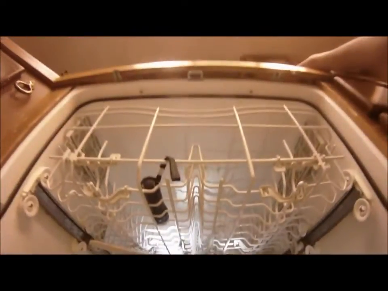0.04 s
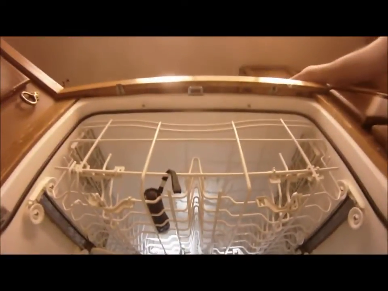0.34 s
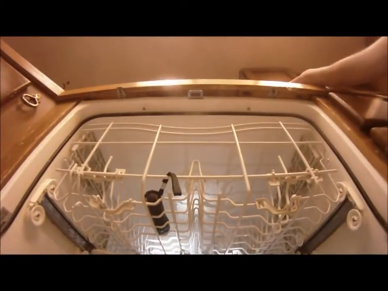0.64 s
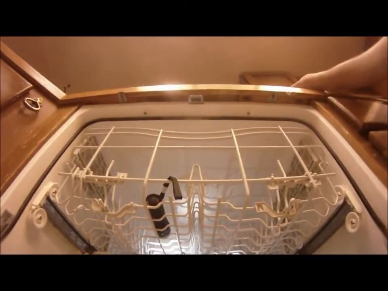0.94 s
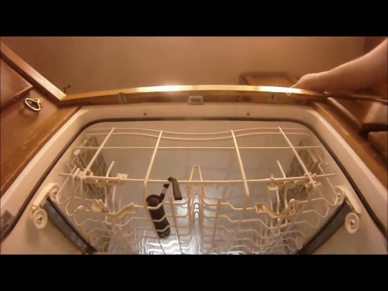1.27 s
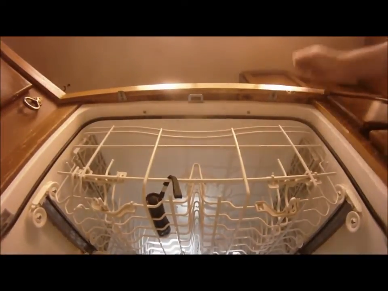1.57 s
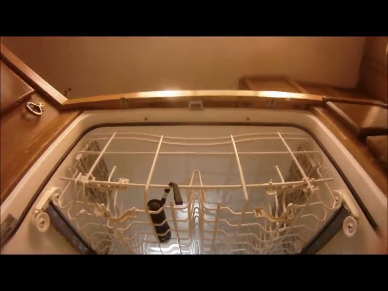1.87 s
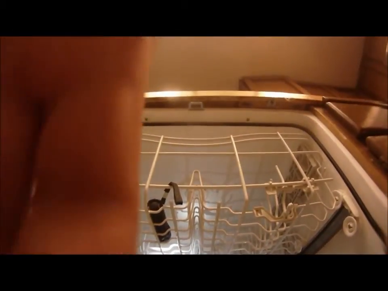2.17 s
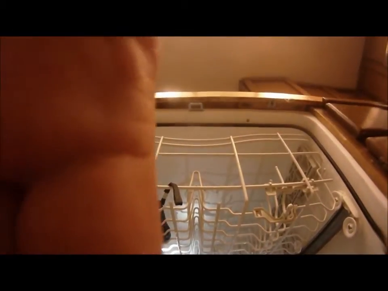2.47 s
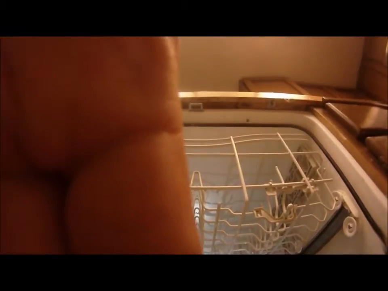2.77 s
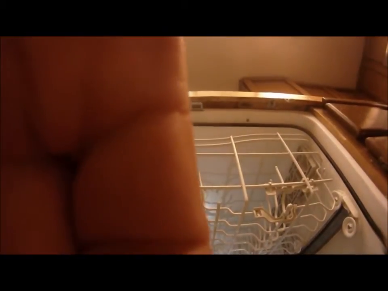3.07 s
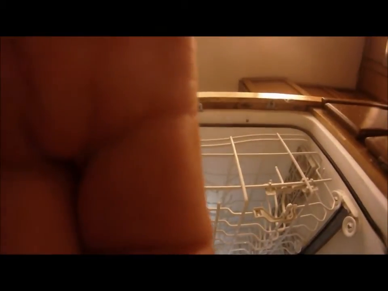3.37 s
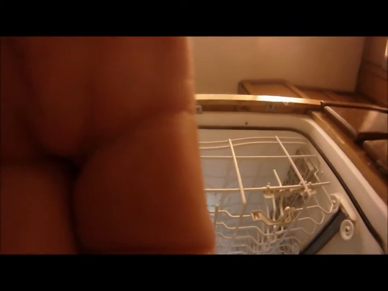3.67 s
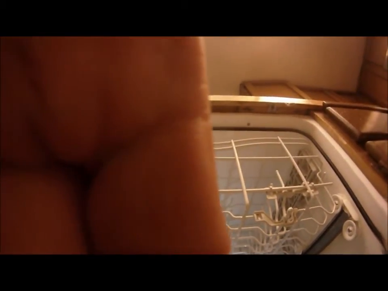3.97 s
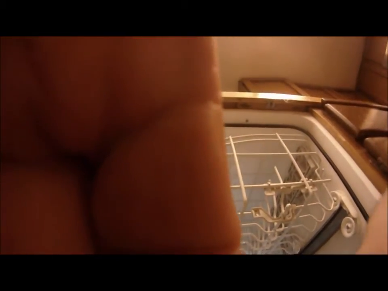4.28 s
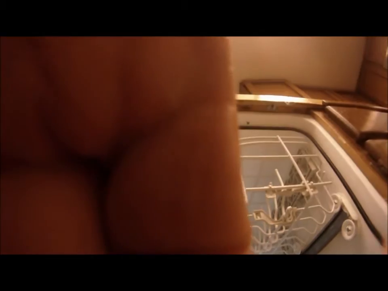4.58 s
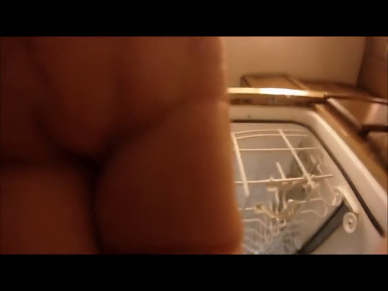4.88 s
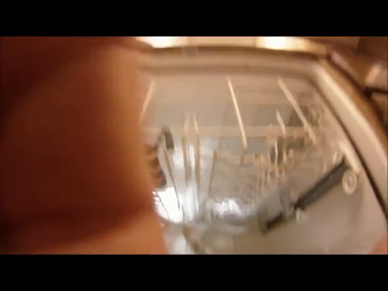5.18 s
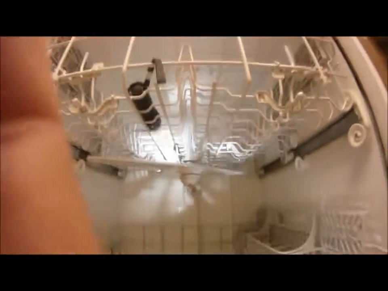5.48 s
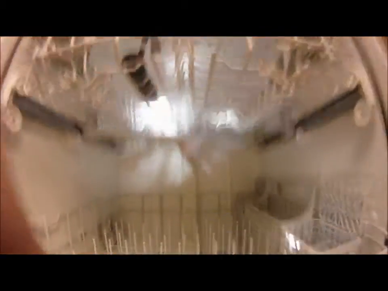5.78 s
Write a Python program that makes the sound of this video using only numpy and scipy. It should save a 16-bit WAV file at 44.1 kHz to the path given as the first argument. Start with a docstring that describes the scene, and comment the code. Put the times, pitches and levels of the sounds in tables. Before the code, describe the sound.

A dishwasher rack is pushed home, its wires chattering and the tub rumbling softly, until it clinks against its stop. After a few faint taps, very close handling noise takes over: a hand rubs and drags across the camera, with short skin squeaks, sharp clicks of the case and dull, heavy finger thumps beside the microphone. A faint kitchen hush lies underneath, and the sound has a slightly gritty top.

```python
"""A low rumble and a rattle of wires: the rack of an open dishwasher rolls home, clinks, bumps its stop.
Then a hand takes hold of the camera: skin scrapes and squeaks over the case, the case clicks,
and fingers pressing beside the microphone port (its small opening) make deep thumps.
The camera samples coarsely, which mirrors everything into a thin, gritty treble."""
import sys
import numpy as np
from scipy import signal
from scipy.fft import rfft, irfft, next_fast_len
from scipy.io import wavfile
from scipy.ndimage import map_coordinates

SR = 44100
rng = np.random.default_rng(int(sys.argv[2]) if len(sys.argv) > 2 else 0)


def master(y):
    """Save y as 16-bit WAV."""
    cut = np.clip(np.atleast_2d(y).T, -1, 1)
    pcm = np.round(cut * 32767)  # scale
    wavfile.write(sys.argv[1], SR, pcm.astype(np.int16))


N = 257103


def amp(db):
    """Turn decibels (dB) into a gain to multiply by."""
    return 10 ** (np.asarray(db) / 20)


def unit(x):
    """Scale x to an average (rms) level of 1."""
    return x / np.sqrt(np.mean(x ** 2) + 1e-20)


def peak_one(x):
    """Scale x to a peak of 1."""
    return x / (np.abs(x).max() + 1e-20)


def add(track, start, x):
    """Mix x into the track, start seconds in."""
    i = max(round(start * SR), 0)
    track[i:i + len(x)] += x[:max(N - i, 0)]


def wobble(rate):
    """A smooth curve through this many random values a second."""
    values = rng.standard_normal(int(N * rate / SR) + 4)
    return map_coordinates(values, [np.arange(N) * rate / SR])


def slips(rate, spread_db):
    """Tiny jerks at random moments and of random size, about rate a second."""
    jerks = (rng.random(N) < rate / SR) * rng.choice([-1, 1], N)
    return unit(jerks * amp(spread_db * rng.standard_normal(N).clip(-2, 2)))


def burst(t, fade):
    """Noise that drops 60 dB in fade seconds."""
    return rng.standard_normal(len(t)) * amp(-60 * t / fade)


def ring(modes, t, attack):
    """A struck object's fading tones (modes), at new strengths for each blow."""
    tones = sum(amp(db + rng.normal(0, 4.7) - 60 * t / fade) * np.sin(2 * np.pi * hz * t)
                for hz, db, fade in modes)
    return peak_one(tones * (1 - np.exp(-t / attack)))


def bell(hz, centre, width):
    """Gain of one resonance: 1 at its centre, less to either side."""
    return 1 / np.sqrt(1 + (2 * (hz - centre) / width) ** 2)


def tone_gain(tone, hz):
    """Gain at hz, read off a curve through (Hz, dB) points."""
    points_hz, points_db = np.transpose(tone)
    return amp(np.interp(np.log(hz + 1), np.log(points_hz + 1), points_db))


def filtered(x, response):
    """Filter x by the gain that response gives for each frequency."""
    size = 2 * next_fast_len(len(x) // 2 + 4096)
    gain = np.maximum(response(np.fft.rfftfreq(size, 1 / SR)), 1e-6)
    cepstrum = irfft(np.log(gain))
    # folding this in half makes the filter ring after a sound, never before it
    cepstrum[1:size // 2] *= 2
    cepstrum[size // 2 + 1:] = 0
    return irfft(rfft(x, size) * np.exp(rfft(cepstrum)), size)[:len(x)]


def coloured(x, tone):
    """Shape x with a tone curve, at an average level of 1."""
    return unit(filtered(x, lambda hz: tone_gain(tone, hz)))


# Resonances of the camera case. Each row: pitch in Hz, width in Hz, strength in dB.
CASE_RESONANCES = [(703, 100, -4.5), (1148, 187, 3.5), (1866, 243, 6), (2436, 300, 0.5), (3060, 126, 3),
                   (3610, 390, 6.5), (4610, 150, 3.5), (5200, 370, -3)]
def through_case(x, tone, ringing=1):
    """Shape x with a tone curve and the case's resonances; a loose hold lets them ring more."""
    def response(hz):
        boost = sum(amp(db) * ringing * bell(hz, pitch, width / ringing) ** 2
                    for pitch, width, db in CASE_RESONANCES)
        return tone_gain(tone, hz) * (1 + boost)
    return unit(filtered(x, response))


# The room's tone. Each row: frequency in Hz, relative level in dB.
KITCHEN_TONE = [(12, -0.5), (20, 3), (63, -8), (262, -22), (825, -30), (2260, -30.5), (4940, -37.5),
                (7500, -45)]
def kitchen():
    """The steady, low hush of a quiet room."""
    return amp(-50.5) * coloured(rng.standard_normal(N), KITCHEN_TONE)


def jingle(rate, spread_db, fade):
    """Many loose wires, each pinging briefly at its own pitch."""
    out, t = np.zeros(N), np.arange(SR // 25) / SR
    for when, pitch, size in rng.random((int(rate * N / SR), 3)):
        hz = 900 * (5500 / 900) ** pitch
        add(out, when * N / SR, amp(spread_db * size - 60 * t / fade) * np.sin(2 * np.pi * hz * t))
    return unit(out)


def push(start, length, db, fade_db_per_s):
    """Gain of one push: the rack gets up to speed, rolls and comes to rest."""
    t = np.arange(N) / SR - start
    onset = np.sqrt(np.clip(t / 0.0025, 0, 1))
    return onset * amp(db - fade_db_per_s * np.maximum(t - length, 0))


# Tones of the tub and of the wires. Each row: frequency in Hz, relative level in dB.
TUB_TONE = [(12, -32), (20, -20), (43, -8), (64, 6.5), (118, -20.5), (182, -13), (248, -38), (330, -46),
            (600, -82)]
WIRE_TONE = [(300, -2), (600, -17), (950, -16), (1250, -11.5), (1750, -17), (2150, -3.5), (2550, -9.5),
             (3300, -7), (4200, -14.5), (5300, -6.5), (7500, -38)]
# A push, then a small shift. Each row: start and length in seconds, rumble and rattle levels in dB.
RACK_PUSHES = [(0.0, 0.53, -35, -53.5), (1.3, 0.68, -58, -72)]
def rolling_rack():
    """The wheels shake the tub and set the wires chattering."""
    roll = sum(push(start, length, db, fade_db_per_s=88) for start, length, db, _ in RACK_PUSHES)
    rattle = sum(push(start, length, db, fade_db_per_s=178) for start, length, _, db in RACK_PUSHES)
    rumble = coloured(rng.standard_normal(N), TUB_TONE)
    loose_wires = jingle(rate=1200, spread_db=20, fade=0.016) + slips(rate=9000, spread_db=3)
    chatter = through_case(loose_wires * amp(3 * wobble(60.2)), WIRE_TONE)
    return roll * rumble + rattle * chatter


# The tub's panels. Each row: pitch in Hz, relative level in dB, seconds to fade by 60 dB.
TUB_MODES = [(45.8, 11, 0.59), (63, 19.5, 0.22), (98.6, 7, 0.32), (162.2, 7.5, 0.11), (202, -7, 0.23)]
# Jolts of the tub. Each row: start in seconds, relative level in dB, favoured pitch in Hz.
TUB_BUMPS = [(0.096, -15.5, 63), (0.239, -24, 185), (0.312, -23.5, 147), (0.424, -24, 201),
             (0.466, -20, 64), (0.531, -20, 143), (0.688, -31, 160), (0.911, -21, 69.6), (0.97, -23, 51.6),
             (1.487, -28, 65)]
def tub_bumps():
    """The rack nudges the tub; each jolt mostly rings the panel tones near its own pitch."""
    out, t = np.zeros(N), np.arange(SR // 3) / SR
    for start, db, pitch in TUB_BUMPS:
        modes = [(hz, level - 9 * abs(np.log2(hz / pitch)), fade) for hz, level, fade in TUB_MODES]
        add(out, start, amp(db - 7.5) * ring(modes, t, attack=0.006))
    return out


# Ticks as the rack settles. Each row: start in seconds, peak level in dB, pitch in Hz.
WIRE_TICKS = [(0.81, -47, 4770), (0.966, -47.5, 3400), (1.287, -49, 3560), (1.699, -52, 1150),
              (1.823, -44, 2860), (1.883, -45.5, 2220)]
def wire_ticks():
    """Single light touches of wire on wire, too weak to rebound."""
    out, t = np.zeros(N), np.arange(SR // 16) / SR
    for start, db, pitch in WIRE_TICKS:
        tick = filtered(burst(t, fade=0.02), lambda hz: bell(hz, pitch, 1700) ** 2)
        add(out, start, amp(db) * peak_one(tick))
    return out


# The rack's ring. Each row: pitch in Hz, relative level in dB, seconds to fade by 60 dB.
WIRE_MODES = [(1083, -16.5, 0.056), (2158, -4, 0.094), (2580, -3, 0.046), (3260, -4, 0.068),
              (3680, -12, 0.05)]
# Wire hitting wire. Each row: start in seconds, relative level in dB, pitch in Hz.
WIRE_TAPS = [(0.012, -42, 1305), (0.078, -43, 2130), (0.092, -37.5, 3280), (0.119, -34.5, 3330),
             (0.144, -29.5, 3210), (0.193, -34, 2205), (0.254, -34.5, 2340), (0.271, -39, 1310),
             (0.415, -34.5, 2290), (0.508, -40, 2200), (0.608, -40, 2840), (1.316, -46, 2100),
             (1.375, -42, 2600), (1.426, -43, 3050), (1.492, -39.5, 990), (1.8, -40.5, 3120),
             (1.917, -41, 1840)]
def wire_taps():
    """A struck wire rings and rebounds twice; the rest of the rack rings more weakly."""
    out, t = np.zeros(N), np.arange(SR // 8) / SR
    rebound_s, rebound_loss_db = 0.0044, 2
    for start, db, pitch in WIRE_TAPS:
        struck = (pitch, 9, 0.031)
        # no two wires are quite alike
        others = [(hz * (1 + 0.05 * rng.normal()), level, fade) for hz, level, fade in WIRE_MODES]
        for hit in range(3):
            tick = peak_one(through_case(burst(t, fade=0.015), WIRE_TONE))
            delay = hit * rebound_s * rng.uniform(0.78, 1.4)
            tap = ring([struck] + others, t, attack=0.00013) + amp(-4) * tick
            add(out, start + delay, amp(db - 4 - hit * rebound_loss_db) * tap)
    return out


# The rail's ring. Each row: pitch in Hz, relative level in dB, seconds to fade by 60 dB.
RAIL_MODES = [(2060, -25.5, 0.0072), (3280, -18.5, 0.0052), (4800, -6, 0.0077)]
# Knocks on the rail. Each row: start in seconds, relative level in dB.
RAIL_CLINKS = [(0.293, -35), (0.438, -39.5), (0.499, -38), (0.502, -34), (0.847, -18), (1.531, -44.5)]
def rail_clinks():
    """A wheel knocks on its rail: a short, bright ring with a faint scrape."""
    out, t = np.zeros(N), np.arange(SR // 8) / SR
    for start, db in RAIL_CLINKS:
        scrape = 0.043 * burst(t, fade=0.059)
        add(out, start, amp(db - 2) * peak_one(ring(RAIL_MODES, t, attack=0.0017) + scrape))
    return out


def rub(start, rise, fall, db, edge_db, curve):
    """Gain of one rub: skin lands edge_db under its peak, speeds up, slows down and lifts off."""
    landing_s, lift_s = 0.16 * rise, 0.006
    out, t = np.zeros(N), np.arange(int((rise + fall + 10 * lift_s) * SR)) / SR
    from_peak = np.where(t < rise, (rise - t) / rise, (t - rise) / fall)
    touching = np.minimum(t / landing_s, 1) * np.exp(-np.maximum(t - rise - fall, 0) / lift_s)
    add(out, start, amp(db - edge_db * from_peak ** curve) * touching)
    return out


def pressure(events, rise, fall):
    """Gain that builds up to each (seconds, dB) event and relaxes after it."""
    out, t = np.zeros(N), np.arange(-10 * rise, 10 * fall, 1 / SR)
    for when, db in events:
        add(out, when + t[0], amp(db) * np.exp(-np.maximum(-t / rise, t / fall)))
    return out


def singing(glide, width_hz):
    """A narrow band of noise whose pitch glides through (seconds, Hz) points."""
    hz, times, spectrum = signal.stft(rng.standard_normal(N), SR, nperseg=256)
    centre = np.interp(times, *np.transpose(glide))
    _, band = signal.istft(spectrum * bell(hz[:, None], centre, width_hz) ** 3, SR, nperseg=256)
    return unit(band[:N])


def catching_skin(rate):
    """Skin catches and lets go unevenly, so its tiny slips flicker in level."""
    return slips(rate, spread_db=3) * amp(2.5 * wobble(260))


# Creaks of the grip. Each row: start in seconds, peak level in dB, pitch in Hz.
GRIP_CREAKS = [(3.697, -32.5, 344), (3.706, -43.5, 1200), (3.746, -35, 825), (3.782, -36, 1080),
               (4.013, -34, 792)]
def grip_creaks():
    """The tightening grip lets go in small dull pops."""
    out, t = np.zeros(N), np.arange(SR // 25) / SR
    for start, db, pitch in GRIP_CREAKS:
        add(out, start, amp(db) * ring([(pitch, 0, 0.009)], t, attack=0.00015))
    return out


# The rasp's tone. Each row: frequency in Hz, relative level in dB.
GRAZE_TONE = [(400, -33), (1000, -3.5), (2500, -2), (4600, -1), (5400, 0.5), (7500, -21)]
# A fingertip brushes the port. Each row: start, rise and fall in seconds, level in dB.
PORT_GRAZES = [(2.17, 0.067, 0.15, -45), (2.35, 0.054, 0.031, -37), (2.47, 0.025, 0.066, -48.5),
               (2.62, 0.0067, 0.048, -48.5), (3.697, 0.0064, 0.014, -52), (4.361, .009, 0.04, -54),
               (4.676, 0.1, 0.258, -32), (5.08, 0.016, 0.014, -33.5), (5.11, 0.18, 0.24, -47.5)]
def port_grazes():
    """Skin ridges crossing the microphone port give a bright, gritty rasp."""
    touch = sum(rub(*row, edge_db=16, curve=2.25) for row in PORT_GRAZES)
    return touch * through_case(catching_skin(rate=2000), GRAZE_TONE)


# The open hand's tone. Each row: frequency in Hz, relative level in dB.
OPEN_HAND_TONE = [(100, -53), (300, -17), (450, -17), (650, -2), (870, -3), (1300, -4.5), (1850, 2),
                  (2150, -2), (2600, 0.5), (3600, -10.5), (4300, -15.5), (5400, -17.5), (7500, -43)]
# Quick strokes. Each row: start, rise and fall in seconds, level in dB, first and last pitch in Hz.
HAND_STROKES = [(2.015, 0.015, 0.033, -27.5, 2680, 2500), (2.035, 0.036, 0.041, -26.5, 2480, 2140),
                (2.108, 0.018, 0.1, -39.5, 1910, 1420), (2.199, 0.053, 0.1, -34, 1900, 1690),
                (2.329, 0.036, 0.11, -37.5, 1930, 2070), (2.436, 0.091, 0.075, -36.5, 2010, 2090),
                (2.654, 0.036, 0.047, -30, 1900, 1915), (2.703, 0.0042, 0.0049, -23, 1900, 2300),
                (2.713, 0.0084, 0.029, -25, 1910, 1870), (2.939, 0.0046, 0.065, -41.5, 2570, 2540),
                (2.995, 0.05, 0.038, -44, 1960, 1830), (3.154, 0.043, 0.012, -22.5, 3200, 2940),
                (3.226, 0.024, 0.013, -29, 2400, 2500), (3.3, 0.098, 0.03, -35.5, 2450, 2660),
                (4.254, 0.037, 0.056, -43, 2560, 2410)]
def hand_strokes():
    """The open hand brushes the case, and the hollow of the hand adds a gliding pitch."""
    touch = sum(rub(*row[:4], edge_db=13.5, curve=1.3) for row in HAND_STROKES)
    glide = []
    for start, rise, fall, _, first_hz, last_hz in HAND_STROKES:
        glide += [(start + rise / 2, first_hz), (start + rise + fall / 2, last_hz)]
    skin = through_case(catching_skin(rate=7000), OPEN_HAND_TONE, ringing=1.32)
    hollow = amp(-3.5) * singing(glide, width_hz=810)
    return touch * unit(skin + hollow)


# The closed hand's darker tone. Each row: frequency in Hz, relative level in dB.
CLOSED_HAND_TONE = [(100, -2.5), (300, 5.5), (450, -9.5), (700, 2), (1000, 0), (1300, -2.5), (1850, 1.5),
                    (2300, 1), (2800, -9), (4300, -15.5), (5400, -23), (7500, -43)]
# Drags over the case. Each row: start, rise and fall in seconds, relative level in dB.
HAND_DRAGS = [(2.222, 0.03, 0.066, -48.5), (3.268, 0.15, 0.13, -44.5), (3.55, 0.052, 0.37, -51.5),
              (3.995, 0.061, 0.07, -48), (4.102, 0.041, 0.092, -44), (4.349, 0.079, 0.037, -47),
              (4.472, 0.015, 0.052, -46), (4.559, 0.043, 0.28, -49.5), (4.692, 0.12, 0.08, -30),
              (4.87, 0.047, 0.13, -34), (5.039, 0.236, 0.237, -41), (5.077, .011, 0.021, -28.5),
              (5.165, 0.016, 0.019, -34), (5.248, 0.0079, .026, -33), (5.316, 0.019, 0.036, -36),
              (5.553, 0.038, 0.07, -46), (5.765, 0.034, .02, -35.5)]
def hand_drags():
    """The closed hand sticks and slips; each thumping finger rubs a little too."""
    finger_rubs = [(when, min(db, -13.5) - 28) for when, db, _ in FINGER_THUMPS]
    touch = np.hypot(drag_gain(), pressure(finger_rubs, rise=0.0021, fall=0.023))
    skin = slips(rate=2200, spread_db=0.5) * amp(2.2 * wobble(110))
    return touch * amp(2.5) * through_case(skin, CLOSED_HAND_TONE)


def drag_gain():
    """How strongly the closed hand drags at each moment."""
    return sum(rub(*row, edge_db=10, curve=1.17) for row in HAND_DRAGS)


def case_judder():
    """The coarse slips of a drag shake the case with a low flutter."""
    shake = filtered(slips(rate=400, spread_db=0), lambda hz: bell(hz, centre=156, width=170) ** 3)
    return drag_gain() * amp(-6) * unit(shake)


# Squeaks. Each row: start, rise and fall in seconds, level in dB, first and last pitch in Hz.
SKIN_SQUEAKS = [(3.166, 0.022, .004, -33, 3600, 2300), (3.18, 0.015, 0.0099, -28, 1950, 1850),
                (3.23, 0.01, 0.01, -30, 980, 2200), (3.244, 0.0069, 0.0088, -26.5, 3550, 3600),
                (4.705, 0.019, 0.011, -26, 2170, 1700), (4.72, 0.058, 0.076, -26, 2330, 2220),
                (4.825, 0.067, 0.027, -26, 1810, 2300), (4.901, 0.0054, 0.078, -25, 1950, 1910)]
def skin_squeaks():
    """In the hardest rubs the skin sings and glides in pitch."""
    out = np.zeros(N)
    for start, rise, fall, db, first_hz, last_hz in SKIN_SQUEAKS:
        squeak = singing([(start, first_hz), (start + rise + fall, last_hz)], width_hz=590)
        out += rub(start, rise, fall, db, edge_db=10.5, curve=1.15) * squeak
    return out


# The bending case's tone. Each row: frequency in Hz, relative level in dB.
FLEX_TONE = [(15, -12), (25, 5.5), (55, 1.5), (100, -5), (150, -18.5), (220, -20), (300, -25.5),
             (420, -24.5), (700, -93)]
# The hand shifts its weight. Each row: time of the peak in seconds, level in dB.
HAND_PRESSES = [(2.2, -26.5), (2.82, -39), (3.24, -18.5), (3.42, -29.5), (3.6, -33), (3.85, -31.5),
                (3.96, -30.5), (4.16, -29), (4.51, -30.5), (4.79, -20.5), (5.11, -26.5), (5.19, -23),
                (5.27, -23.5)]
def case_flexing():
    """The hand's tremor, weight and dragging bend the case, which rumbles."""
    grip_start_s = 2.03
    tremor = amp(-46) * (np.arange(N) / SR > grip_start_s)
    weight = pressure(HAND_PRESSES, rise=0.024, fall=0.036)
    pull = amp(-17) * drag_gain() ** 0.49  # bending grows more slowly than the drag's friction
    rumble = coloured(rng.standard_normal(N) * amp(3.2 * wobble(30)), FLEX_TONE)
    return np.sqrt(tremor ** 2 + weight ** 2 + pull ** 2) * rumble


# A click's tone. Each row: frequency in Hz, relative level in dB.
CLICK_TONE = [(100, -15.5), (280, 5.5), (450, -6), (720, -2), (1400, -1.5), (1900, -2.5), (2700, -4),
              (3500, -9), (5300, -6.5), (7500, -42)]
# Clicks under the fingers. Each row: start in seconds, relative snap and knock levels in dB,
# pitch in Hz, and the frequency in Hz above which soft flesh dulls the snap.
CASE_CLICKS = [(1.44, -37.5, -64, 2230, 5030), (1.971, -33, -63, 2880, 6000),
               (2.149, -24.5, -29, 1890, 6000), (2.353, -22.5, -34, 2350, 5000),
               (3.168, -5.5, -16.5, 1660, 2830), (3.219, -11.5, -50, 1230, 1900),
               (3.37, -20.5, -27.5, 1750, 3460), (3.6, -25, -28.5, 2120, 2470),
               (3.921, -24.5, -38, 2300, 2300), (3.9472, -16, -16, 750, 1156),
               (3.995, -25, -29, 1100, 2010), (4.023, -24.5, -30, 2130, 3450),
               (4.068, -25.5, -25.5, 1080, 3050), (4.143, -14, -28, 2330, 3500),
               (4.546, -15.5, -29, 1930, 4970), (4.766, -14, -25, 2220, 3500),
               (4.797, -19, -35, 2000, 3570), (4.895, -11.5, -32, 2300, 5000),
               (4.908, -9.5, -53, 2030, 4530), (4.985, -12.5, -41, 2400, 5000),
               (5.015, -16.5, -53, 1900, 5030), (5.086, -18, -20.5, 1074, 1788),
               (5.145, -14.5, -29, 1390, 6000), (5.201, -6.5, -22, 1310, 9000),
               (5.261, -19.5, -21, 1184, 2030), (5.285, -17.5, -26, 2290, 6500),
               (5.337, -19, -53, 1250, 1800), (5.558, -6, -21.5, 1860, 5040),
               (5.635, -6.5, -22, 1160, 2280), (5.646, -15, -32, 1960, 5030),
               (5.785, -13.5, -36, 1140, 2590), (5.791, -8.5, -23, 2030, 5000)]
def case_clicks():
    """A snap with brief chatter, pitched by where it lands, while the case gives with a low knock."""
    out, t = np.zeros(N), np.arange(SR // 12) / SR
    for start, db, knock_db, pitch, dull_hz in CASE_CLICKS:
        snap = rng.standard_normal(len(t)) * (amp(-60 * t / 0.014) + amp(-20 - 60 * t / 0.065))
        snap[0] += 9  # the sharp first edge
        snap = filtered(
            snap, lambda hz: (1 + 2 * bell(hz, pitch, 680) ** 2) / np.hypot(1, (hz / dull_hz) ** 2))
        add(out, start + 0.0006, amp(db + 1.18) * peak_one(through_case(snap, CLICK_TONE)))
        knock = ring([(68.3, 1.0, 0.05), (148, 1.5, 0.016)], t, attack=0.00037)
        add(out, start, amp(min(knock_db, -15) + 4.5) * knock)  # the stiff case gives only so far
    return out


# Presses beside the port. Each row: moment of lifting in seconds, level in dB, release in seconds.
FINGER_THUMPS = [(2.803, -29.5, 0.0022), (3.1613, -15.5, 0.0039), (3.222, -9, 0.0017),
                 (3.3727, -15.5, 0.001), (3.4, -20.5, 0.0017), (3.425, -20, 0.0015), (3.9488, -9.5, 0.0012),
                 (5.09, -19, 0.0027), (5.098, -10, 0.0017), (5.168, -8.5, 0.0017), (5.172, -12, 0.0024),
                 (5.253, -9, 0.0026), (5.333, -7.5, 0.0021), (5.4213, -2, 0.002), (5.502, -22.5, 0.0011),
                 (5.6346, 1, 0.0018), (5.785, -0.5, 0.0024)]
def finger_thumps():
    """Air pressure swells under the finger, flips to suction as it lifts, and leaks away."""
    out, lead_s = np.zeros(N), 0.03
    t = np.arange(-lead_s, 2 * lead_s, 1 / SR)
    before, after = np.minimum(t, 0), np.maximum(t, 0)
    for when, db, release in FINGER_THUMPS:
        pressed = (1 - np.tanh(t / (0.013 * release))) / 2
        squeeze = 0.38 * np.exp(before / (0.77 * release)) * pressed
        suction = (after / release * np.exp(1 - after / release)) ** 3.72
        scuff = through_case(rng.standard_normal(len(t)), CLOSED_HAND_TONE) * np.exp(-np.abs(t) / 0.0039)
        add(out, when - lead_s, amp(db) * (squeeze - suction + amp(-24.5) * scuff))
    return out


def scene():
    """The quiet kitchen, the dishwasher rack and the hand on the camera, in one channel."""
    room = kitchen()
    rack = rolling_rack() + tub_bumps() + wire_taps() + rail_clinks() + wire_ticks()
    hand = hand_strokes() + hand_drags() + skin_squeaks() + case_flexing() + case_judder()
    fingers = port_grazes() + case_clicks() + grip_creaks() + finger_thumps()
    return (room + rack + hand + fingers)[None]


def coarse_sampling(x, rate_hz=12000, band_hz=5710):
    """Holding each coarse sample mirrors the sound around the sampling rate as a thin, gritty treble."""
    narrow = filtered(x, lambda hz: 1 / np.hypot(1, (hz / band_hz) ** 24))
    mirrored = narrow * (1 + 2 * np.cos(2 * np.pi * rate_hz * np.arange(N) / SR))
    size = next_fast_len(N + SR // 10)
    hold_gain = np.sinc(np.fft.rfftfreq(size, 1 / SR) / rate_hz)
    return irfft(rfft(mirrored, size) * hold_gain, size)[:N]


# The dip made by the port's hollow. Each row: frequency in Hz, width in Hz, depth in dB.
PORT_DIP = [(410, 52, 4)]
def record(dry):
    """The port dips one band and leaks the deepest bass; the camera samples coarsely and caps peaks."""
    def port_gain(hz):
        return amp(-sum(db * bell(hz, centre, width) ** 2 for centre, width, db in PORT_DIP))
    bass_cut = signal.butter(1, 10, "high", fs=SR, output="sos")
    treble_cut = signal.ellip(10, 0.1, 90, 15600, fs=SR, output="sos")
    at_microphone = signal.sosfilt(bass_cut, filtered(dry[0], port_gain))
    sampled = coarse_sampling(at_microphone).clip(-1, 1)
    return signal.sosfilt(treble_cut, sampled)[None]


dry = scene()
out = record(dry)
master(out)
```